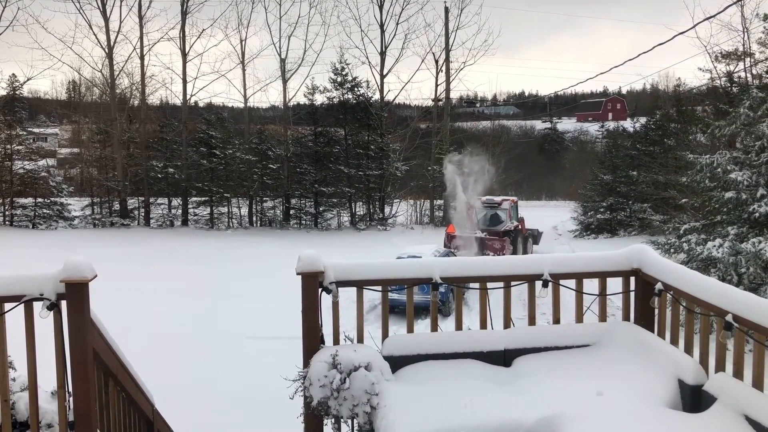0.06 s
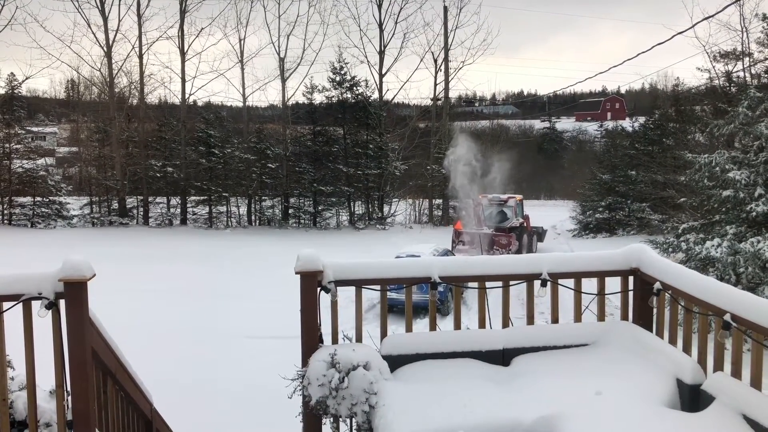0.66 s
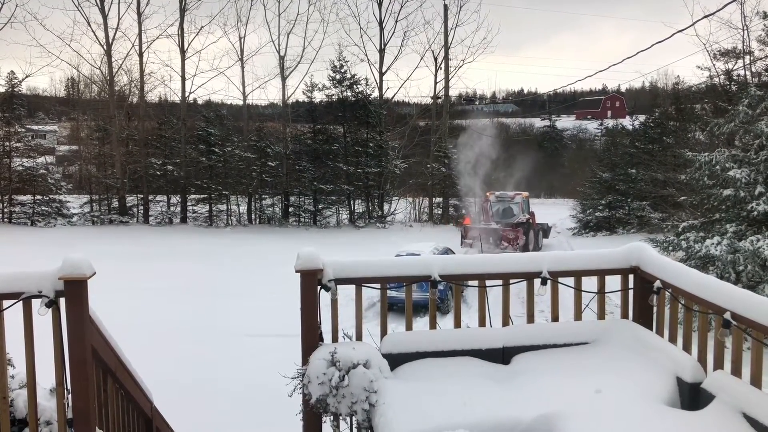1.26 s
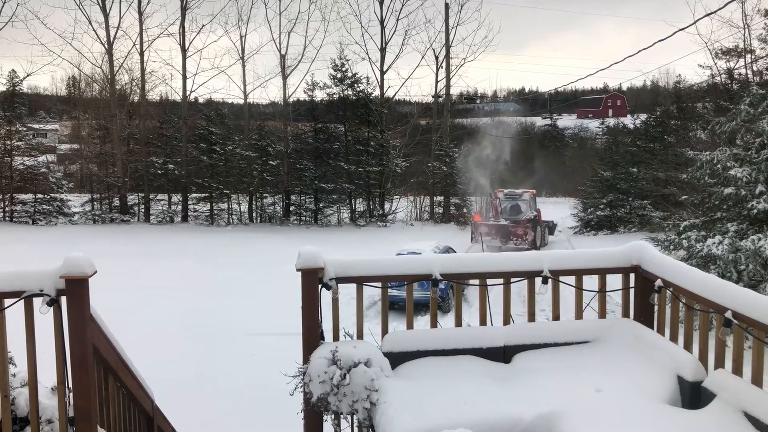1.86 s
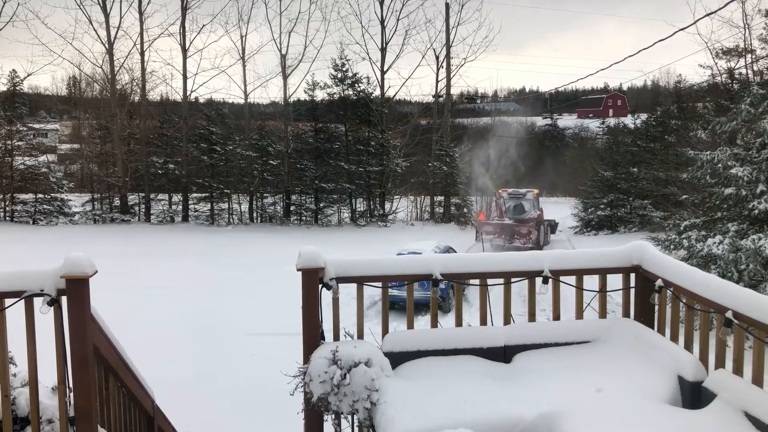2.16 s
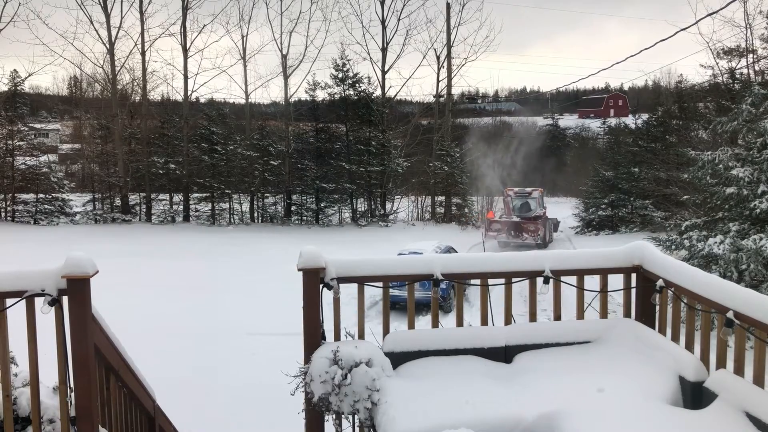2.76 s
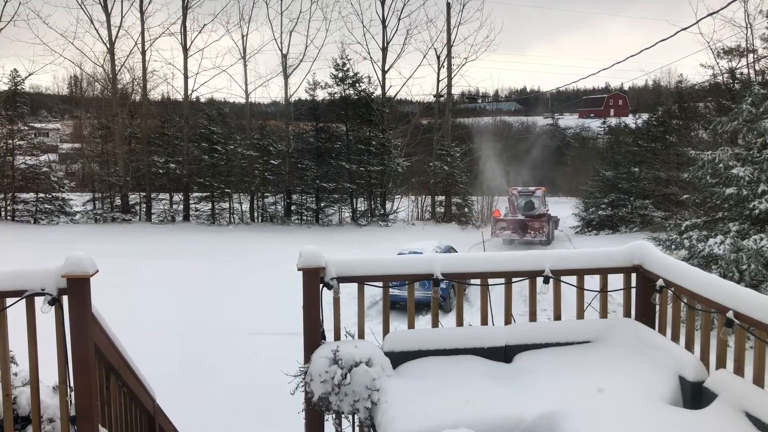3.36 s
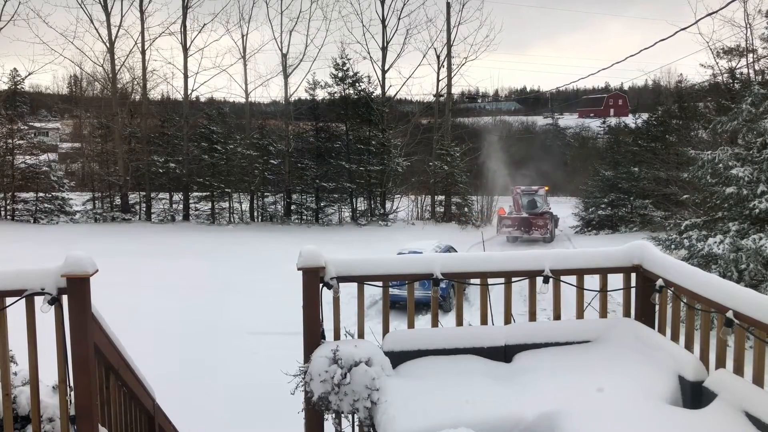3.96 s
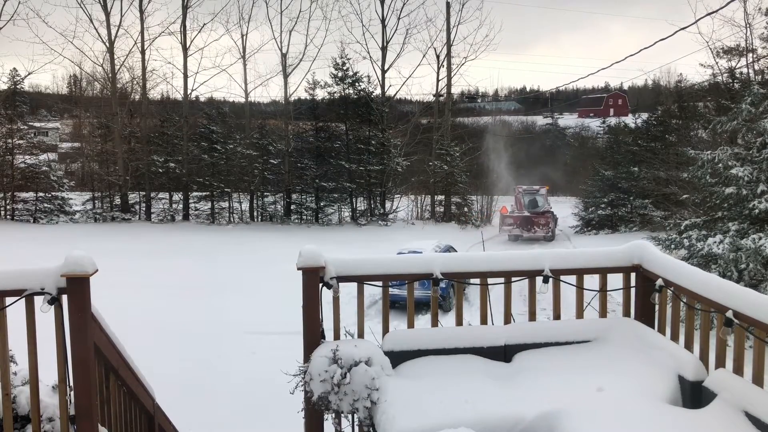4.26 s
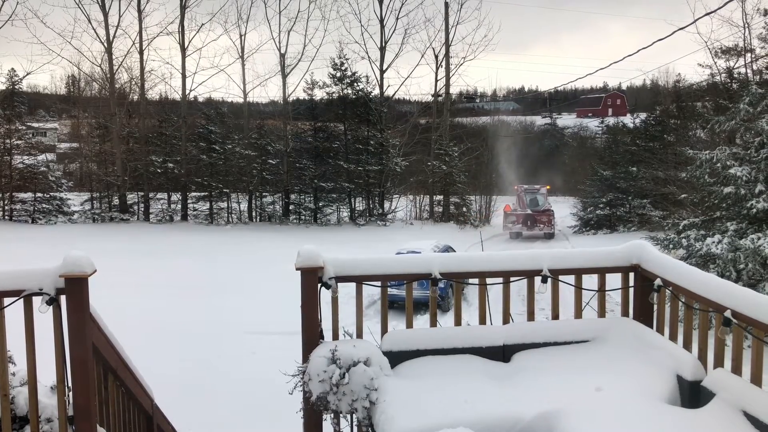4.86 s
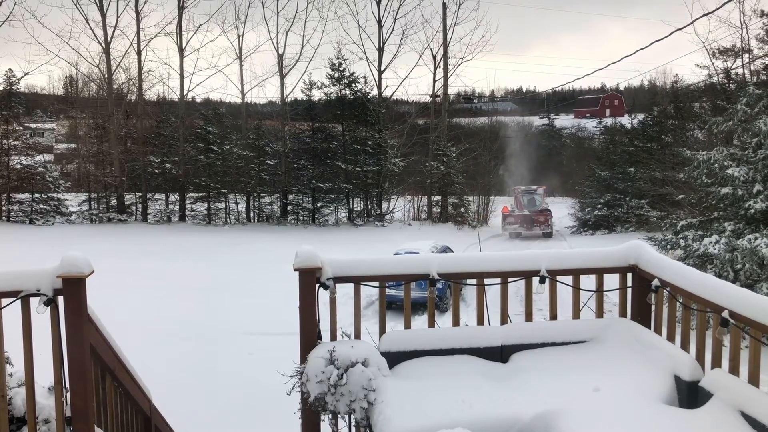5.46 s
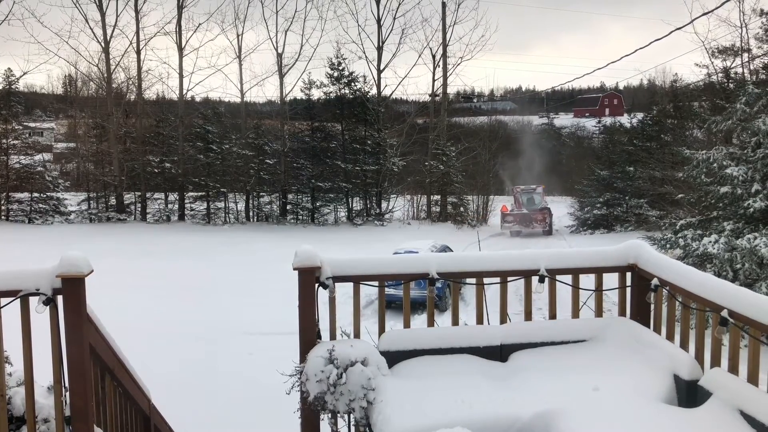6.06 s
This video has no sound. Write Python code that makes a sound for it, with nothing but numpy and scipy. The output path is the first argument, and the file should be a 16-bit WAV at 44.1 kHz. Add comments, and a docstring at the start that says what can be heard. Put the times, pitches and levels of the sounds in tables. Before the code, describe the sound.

Outdoors, some way from the microphone, a diesel tractor pulls hard with a low boom and picks up to an even, throbbing drone. Its snowblower gives a continuous rush of snow and air that swells once into a brief, soft hiss. Metal parts rattle lightly and faint high whines come and go. The engine and blower tones fade slightly as the tractor drives off.

```python
"""A small diesel tractor booms under full fuel, some way off across a snowy yard, then settles to a hum.
The governor eases the fuel as the engine nears its set speed; the snowblower's blade tones come up
and beat against the exhaust in a quick throb. Over it lie the rush of thrown snow, a light clatter
of metal, a few thin whines and one hissing surge of snow. The tones fade as the tractor drives off."""
import sys
import numpy as np
from scipy import signal
from scipy.fft import rfft, irfft, next_fast_len
from scipy.io import wavfile

SR = 44100
rng = np.random.default_rng(int(sys.argv[2]) if len(sys.argv) > 2 else 0)


def file_out(sig):
    """Save sig as 16-bit WAV at sys.argv[1]."""
    # one column per channel
    cols = np.atleast_2d(sig).T
    # limit, then scale
    lim = np.clip(cols, -1, 1)
    pcm = np.round(lim * 32767).astype(np.int16)
    wavfile.write(sys.argv[1], SR, pcm)


N = 274302
TIME = np.arange(N) / SR

# the engine's firing rate as it runs up and settles: t/s, f/Hz
FIRING_RATE = [(0, 54.4), (0.2, 55.5), (0.7, 60.4), (1.3, 63.1), (2.25, 63.3), (2.6, 62.2), (3.3, 63.0),
               (3.7, 62.3), (4.45, 64.1), (5.05, 63.4), (6.2, 63.8)]
# three clean exhaust tones, from the firing tone up: base level/dB, change at full fuel/dB
EXHAUST_TONES = [(-48, 8), (-51.5, 2), (-48.5, -3.5)]
# swells in the drone of the third tone: middle t/s, half width/s, lift/dB
DRONE_SWELLS = [(1.35, 0.26, 11), (2.22, 0.4, 10), (4.1, 0.56, 6.5)]
# weaker tones of uneven cylinders and belt-driven parts: multiple of the firing rate, level/dB
ROUGH_ORDERS = [(1.372, -71), (1.5, -67.5), (1.645, -68), (1.75, -64), (2.25, -66.5), (2.707, -60),
                (3.202, -58.5), (3.5, -70.5), (3.75, -65.5), (4, -69.5), (4.25, -69), (4.64, -66.5),
                (5.6, -74), (7.44, -71.5)]
# resonances of the exhaust pipe: f/Hz, width/Hz, relative level/dB
PIPE_MODES = [(191.9, 6.5, 3), (296, 13.5, -19)]
# colour of the exhaust gas: f/Hz, relative level/dB
RUMBLE_SPECTRUM = [(20, -40), (40, -22), (75, -6), (92, -15), (115, -2), (150, -12), (172, 0), (198, 2.5),
                   (212, -4.5), (265, 0.5), (320, -7.5), (400, -10), (540, -21), (1200, -54.5)]
# colour of snow and air in the chute: f/Hz, relative level/dB
RUSH_SPECTRUM = [(150, -5.5), (400, -2), (580, -2.5), (760, 1), (950, -2.5), (1200, -0.5), (1420, -9.5),
                 (1600, -8), (2050, -13), (2900, -15), (3800, -17), (5000, -22), (8000, -33), (15000, -36)]
# ringing metal, heard from the side and from behind: f/Hz, width/Hz, relative level/dB
SIDE_MODES = [(740, 140, -6), (1307, 136, 7), (1511, 30, 8.5), (2294, 110, -4), (2590, 340, -2.5),
              (3270, 95, -6), (4055, 80, 0)]
REAR_MODES = [(368, 80, 5), (472, 35, 3.5), (659, 37, 3.5), (768, 55, 9), (934, 95, 7), (1099, 36, 7),
              (1626, 20, 2), (2293, 78, -5.5), (2530, 180, -6.5), (3320, 70, -16), (4010, 155, -5.5),
              (4690, 120, -15)]
# the tractor's heading: t/s, turn (0 side on, 1 facing away)
HEADING = [(0, 0.16), (1.3, 0.37), (3, 0.69), (5, 0.57)]
# the fan's tones: multiple of the blade rate, relative level/dB
BLADE_TONES = [(2, -9), (3, -13.5), (5, -11.5), (6, -1), (7, -29), (9, -20), (10, -23)]
# thin whines: start t/s, end t/s, f/Hz, start level/dB, end level/dB, climb from t/s
WHINES = [(-.2, 1.1, 4177, -77.5, -79, 2.7), (-.2, 4, 4022, -84, -77.5, 3.3),
          (1.4, 3.25, 3910, -78, -77, 2.7), (2.6, 6.5, 4215, -84, -79, 2.7),
          (3.4, 6.5, 3906, -82, -70.5, 2.7)]
# the partials of each whine: multiple of its pitch, relative level/dB
WHINE_PARTIALS = [(.6395, -4), (1, 0)]
# colour of the background air: f/Hz, relative level/dB
AIR_SPECTRUM = [(20, 14.5), (500, 9.5), (5000, 2), (8000, 1.5), (12500, -1.5), (15000, -2), (15300, 1),
                (15600, -1)]
# colour of the surging snow spray: f/Hz, relative level/dB
HISS_SPECTRUM = [(1500, -10), (2450, 10), (3000, -13), (3750, 9), (4400, 1), (5500, -12), (7500, -25),
                 (12000, -26)]

GOVERNED_HZ, DROOP_HZ = 64.5, 3.8  # no extra fuel at the set firing rate, full fuel a droop below it
BLADES_PER_FIRING = .4705
EXHAUST_RECEDE_DB_PER_S, BLOWER_RECEDE_DB_PER_S = 0.52, 0.75  # the tractor drives off
BLOWER_DB, BLOWER_DB_PER_HZ = -46.5, 1.4  # base level; drop for each Hz the engine lags
RUMBLE_DB, RUSH_DB, AIR_DB = -53, -57.5, -71.5
BOOM_DB, BOOM_FUEL_DB = -57.5, 11.5  # the pipe's boom, and its lift at full fuel
SURGE_HISS_DB, SURGE_RUMBLE_LIFT_DB, SURGE_RUSH_LIFT_DB = -65.5, 4, 1.9
WHINE_FADE_S, WHINE_FLARE_DB, WHINE_CLIMB_PER_S = 0.13, 1.3, .009  # the climb is a share of the pitch
HIGH_CUT_HZ = 15800


def amp(db):
    """Decibels to gain."""
    return 10 ** (np.asarray(db) / 20)


def unit_rms(x):
    """Scales x to an rms of one."""
    return x / np.sqrt(np.mean(x ** 2) + 1e-20)


def curve(points):
    """Joins (time, value) points with straight ramps."""
    return np.interp(TIME, *np.transpose(points))


def swell(middle_s, half_width_s):
    """A smooth rise to one and back."""
    return np.exp(-((TIME - middle_s) / half_width_s) ** 2)


def filtered(x, gain):
    """Equalises x with a gain given as a function of frequency."""
    size = next_fast_len(N)
    return irfft(rfft(x, size) * gain(np.fft.rfftfreq(size, 1 / SR)), size)[:N]


def coloured(x, spectrum):
    """Colours x with a spectrum, at unit rms."""
    hz, db = np.transpose(spectrum)
    return unit_rms(filtered(x, lambda f: amp(np.interp(np.log(f + 1), np.log(hz), db))))


def ringing(x, modes):
    """Rings x through a bank of resonances, at unit rms."""
    def peaks(f):
        return sum(amp(db) / (1 + (2 * (f - hz) / width) ** 2) for hz, width, db in modes)
    return unit_rms(filtered(x, peaks))


def wander(rate_hz, size=2048):
    """A random drift of unit rms, mostly slower than the rate."""
    f = np.fft.rfftfreq(size, TIME[-1] / size)
    slow = irfft(rfft(rng.standard_normal(size)) * (f > 0) / (1 + (f / rate_hz) ** 4))
    return np.interp(TIME, np.linspace(0, TIME[-1], size), unit_rms(slow))


def tone(turns, waver, rate_hz):
    """A sine of about unit rms that wavers in level and phase."""
    angle = 2 * np.pi * (turns + rng.random()) + waver * wander(rate_hz)
    return np.sqrt(2) * np.sin(angle) * (1 + waver * wander(rate_hz)) / np.sqrt(1 + waver ** 2)


def puffs(turns, depth):
    """An envelope that pulses once a turn."""
    return unit_rms(np.exp(depth * np.cos(2 * np.pi * turns)))


def churn(turns, alike, size=1024):
    """Noise in which a share loops with every turn and changes only slowly."""
    position = turns % 1 * size
    loops = np.array([np.interp(position, np.arange(size), p) for p in rng.standard_normal((4, size))])
    blend = np.array([wander(1.46) for _ in loops])
    looped = (blend * loops).sum(0) / np.linalg.norm(blend, axis=0)  # the texture drifts, its power stays
    samples_per_step = N / (turns[-1] * size)
    return np.sqrt(alike / samples_per_step) * looped + np.sqrt(1 - alike) * rng.standard_normal(N)


def engine_hum(firings, fuel):
    """The firings sound three clean exhaust tones that follow the fuel, with weaker, rougher orders."""
    levels_db = [db + fuel_db * fuel - EXHAUST_RECEDE_DB_PER_S * TIME for db, fuel_db in EXHAUST_TONES]
    levels_db[2] += sum(db * swell(middle, width) for middle, width, db in DRONE_SWELLS)
    hum = sum(amp(db) * tone(k * firings, waver=.035 * k, rate_hz=6) for k, db in enumerate(levels_db, 1))
    rough = sum(amp(db) * tone(k * firings, waver=0.35, rate_hz=3.2) for k, db in ROUGH_ORDERS)
    return hum + rough


def exhaust_rumble(firings, fuel, surge):
    """Gas leaves the pipe in puffs, and the pipe booms at its own pitches when the engine pulls hard."""
    gas = rng.standard_normal(N) * puffs(firings, depth=0.26)
    rumble = amp(RUMBLE_DB + SURGE_RUMBLE_LIFT_DB * surge) * coloured(gas, RUMBLE_SPECTRUM)
    boom = amp(BOOM_DB + BOOM_FUEL_DB * fuel ** 2) * ringing(rng.standard_normal(N), PIPE_MODES)
    return rumble + boom


def snow_rush(blades, surge):
    """The three-bladed fan flings snow and air up the chute in a slightly lumpy flow."""
    flow = churn(blades / 3, alike=.45)
    flutter_db = 0.61 * wander(rate_hz=17)
    return amp(RUSH_DB + SURGE_RUSH_LIFT_DB * surge + flutter_db) * coloured(flow, RUSH_SPECTRUM)


def metal_clatter(firings):
    """Each engine cycle shakes the metal; side panels crossfade to rear ones as the tractor turns away."""
    knocks = churn(firings / 4, alike=.5) * puffs(firings, depth=.2)
    turned = curve(HEADING)
    side = amp(-64.0) * np.sqrt(1 - turned) * ringing(knocks, SIDE_MODES)
    rear = amp(-61.5) * np.sqrt(turned) * ringing(knocks, REAR_MODES)
    flutter_db = 0.49 * wander(rate_hz=7.7)
    return amp(flutter_db) * (side + rear)


def blower_throb(blades, lag_hz):
    """Blades pass the chute; their sixth harmonic lies just under the engine's third and beats with it."""
    level_db = BLOWER_DB - BLOWER_DB_PER_HZ * lag_hz - BLOWER_RECEDE_DB_PER_S * TIME
    return amp(level_db) * sum(amp(db) * tone(k * blades, waver=.18, rate_hz=3) for k, db in BLADE_TONES)


def whine(start, end, hz, start_db, end_db, climb_s):
    """Two high partials fade in, flutter and flare; if still sounding at climb_s, they creep upward."""
    pitch_hz = hz * (1 + WHINE_CLIMB_PER_S * np.maximum(TIME - climb_s, 0))
    turns = np.cumsum(pitch_hz) / SR
    fade = np.clip(np.minimum(TIME - start, end - TIME) / WHINE_FADE_S, 0, 1)
    level_db = curve([(start, start_db), (end, end_db)]) + WHINE_FLARE_DB * wander(rate_hz=7)
    partials = sum(amp(db) * tone(k * turns, waver=.36, rate_hz=12) for k, db in WHINE_PARTIALS)
    return fade * amp(level_db) * partials


def still_air():
    """A faint, steady bed of noise under everything."""
    return amp(AIR_DB) * coloured(rng.standard_normal(N), AIR_SPECTRUM)


def snow_hiss(surge):
    """One surge of thrown snow swells into a soft, bright hiss and dies away."""
    return amp(SURGE_HISS_DB) * surge * coloured(rng.standard_normal(N), HISS_SPECTRUM)


def scene():
    """The engine's speed sets the fuel and, through a fixed gear, the blower's pace; the mix is mono."""
    firing_hz = curve(FIRING_RATE)
    lag_hz = GOVERNED_HZ - firing_hz
    fuel = np.clip(lag_hz / DROOP_HZ, 0, 1)
    surge = swell(middle_s=1.365, half_width_s=0.27)
    firings = np.cumsum(firing_hz) / SR  # running count
    blades = BLADES_PER_FIRING * firings
    tractor = engine_hum(firings, fuel) + exhaust_rumble(firings, fuel, surge) + metal_clatter(firings)
    whines = sum(whine(*row) for row in WHINES)
    snowblower = blower_throb(blades, lag_hz) + snow_rush(blades, surge) + snow_hiss(surge)
    return (tractor + whines + snowblower + still_air())[None]


def record(dry):
    """A steep high cut takes off the very top of the treble."""
    taps = signal.firwin(511, HIGH_CUT_HZ, window=("kaiser", 9), fs=SR)
    return signal.oaconvolve(dry, taps[None], "same")


dry = scene()
out = record(dry)
file_out(out)
```